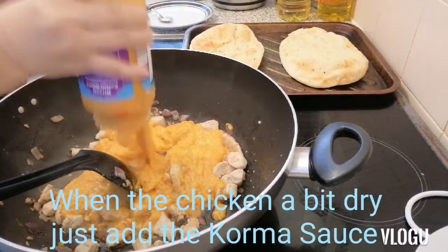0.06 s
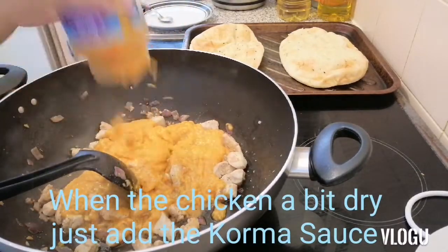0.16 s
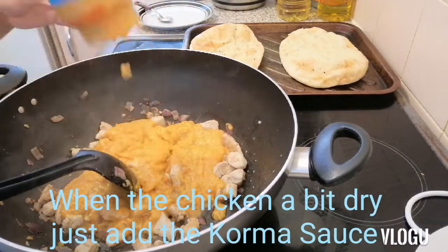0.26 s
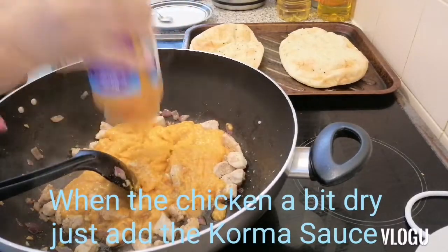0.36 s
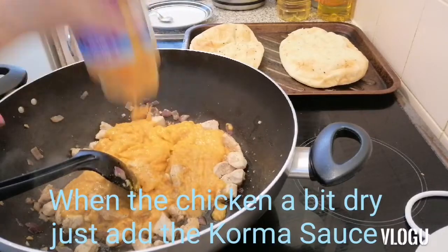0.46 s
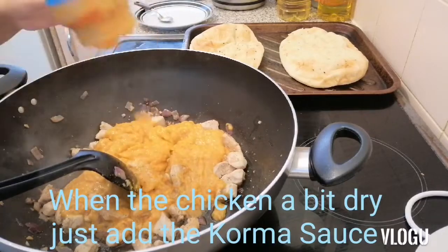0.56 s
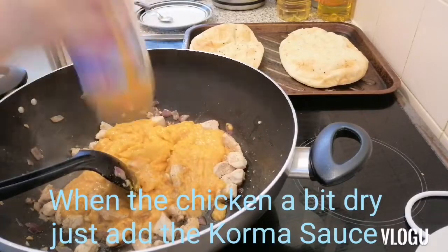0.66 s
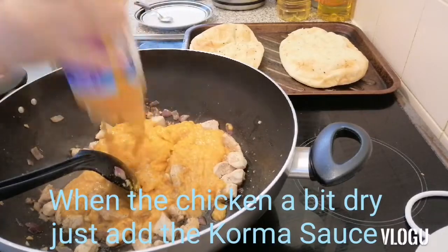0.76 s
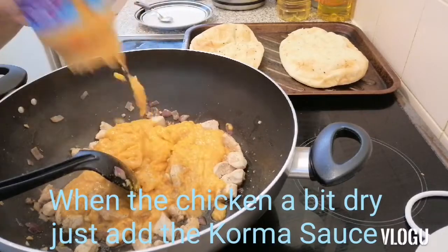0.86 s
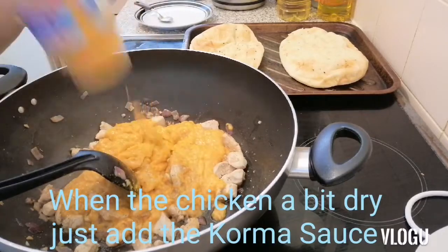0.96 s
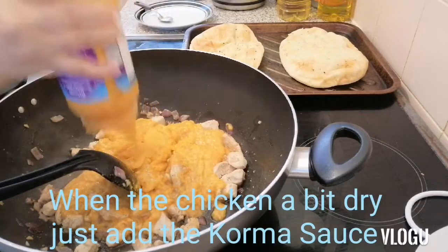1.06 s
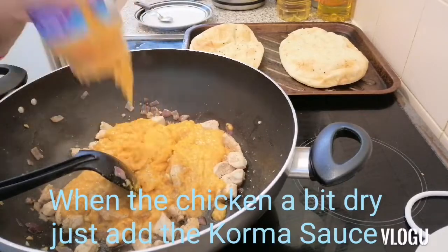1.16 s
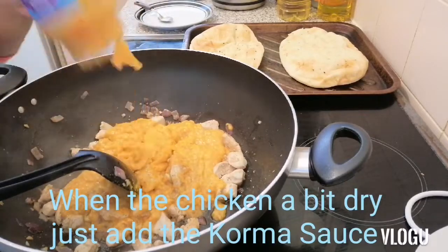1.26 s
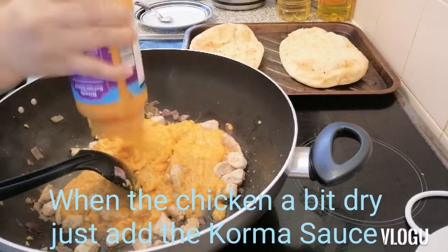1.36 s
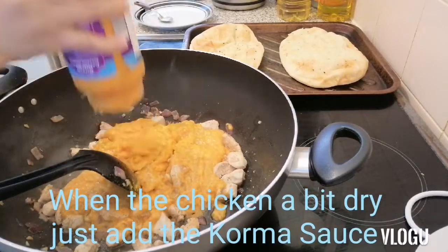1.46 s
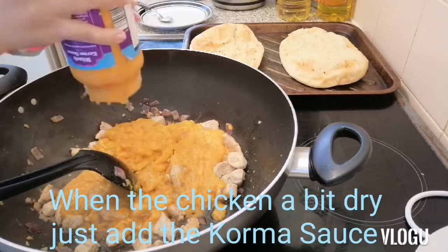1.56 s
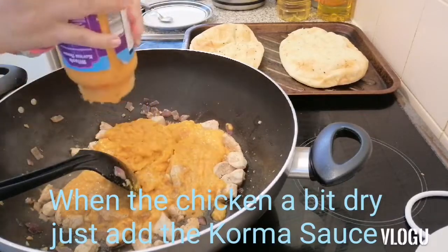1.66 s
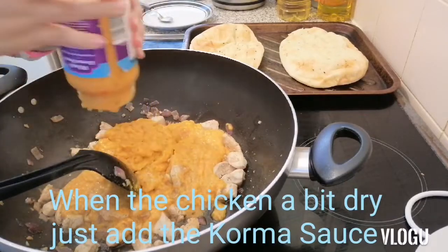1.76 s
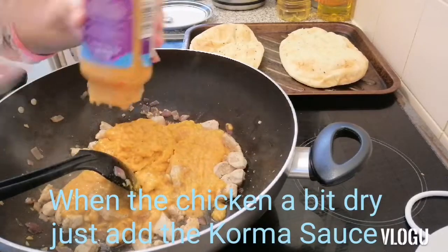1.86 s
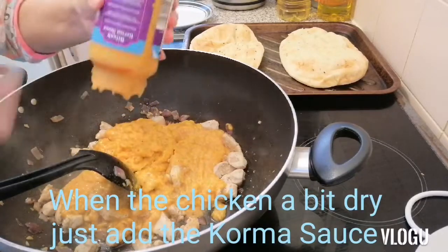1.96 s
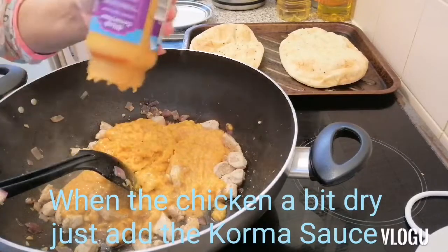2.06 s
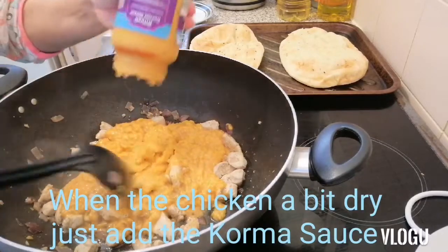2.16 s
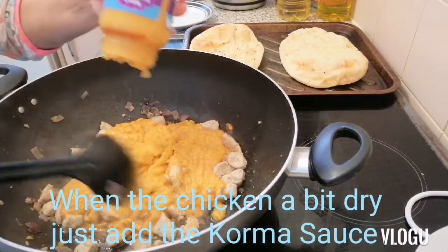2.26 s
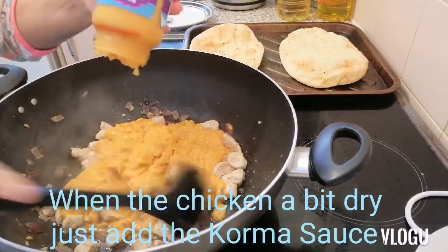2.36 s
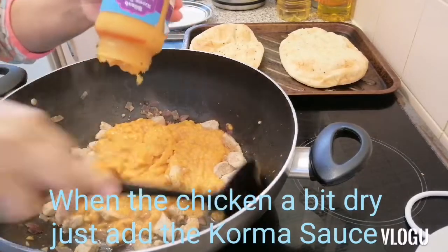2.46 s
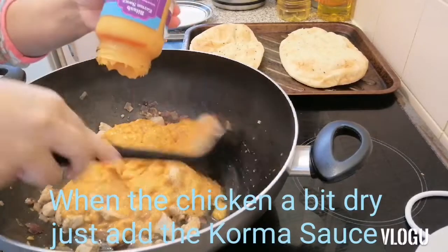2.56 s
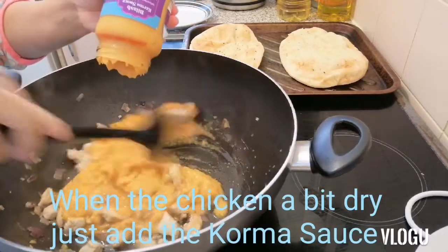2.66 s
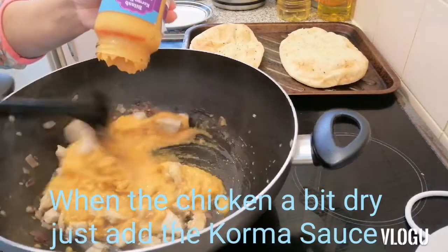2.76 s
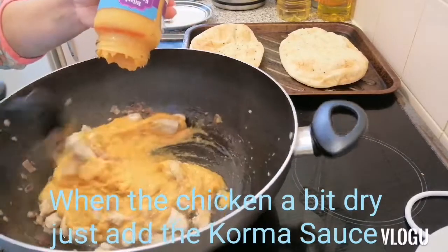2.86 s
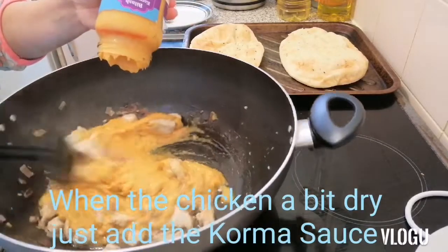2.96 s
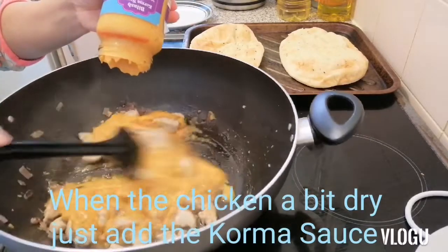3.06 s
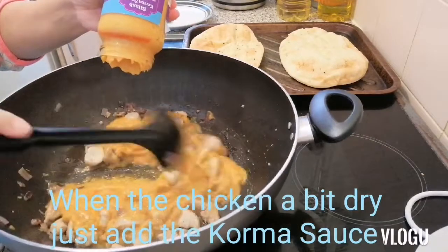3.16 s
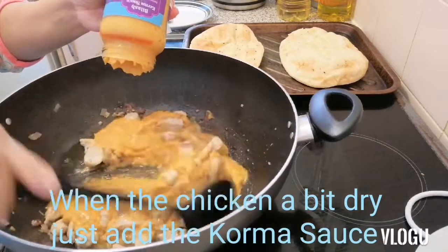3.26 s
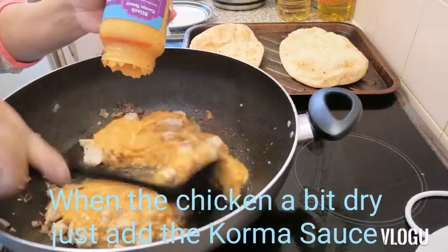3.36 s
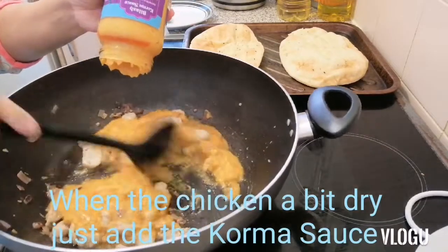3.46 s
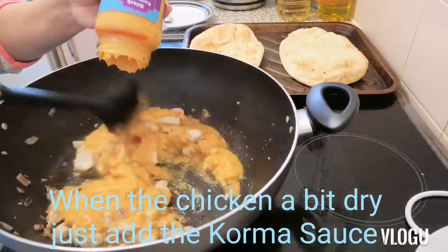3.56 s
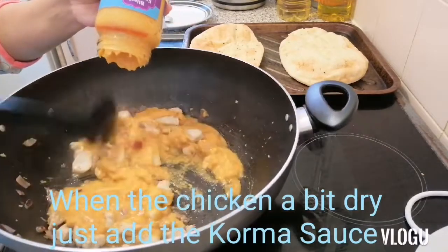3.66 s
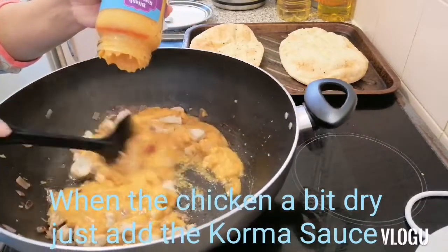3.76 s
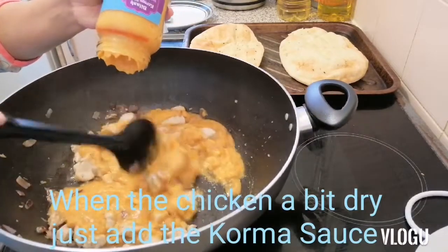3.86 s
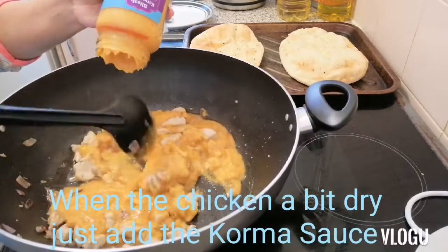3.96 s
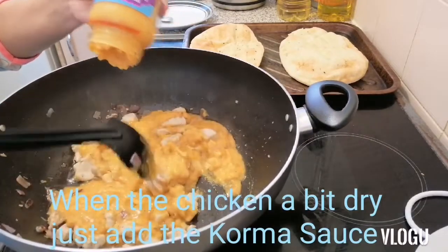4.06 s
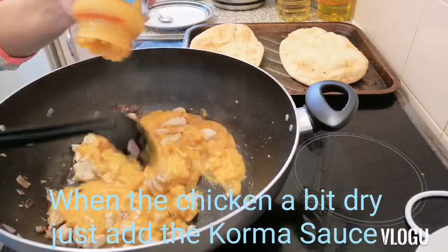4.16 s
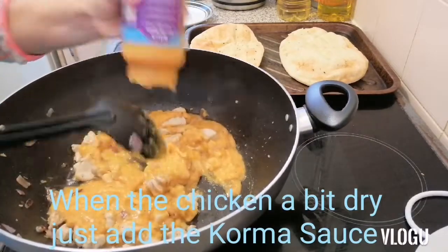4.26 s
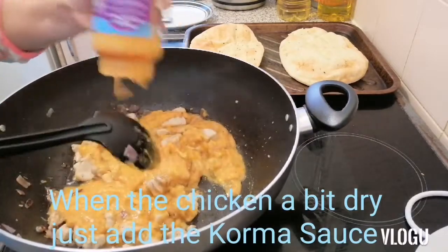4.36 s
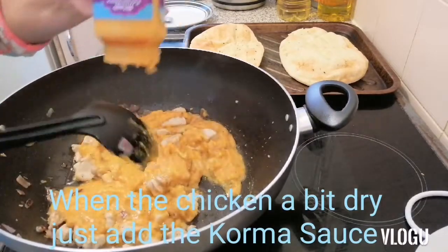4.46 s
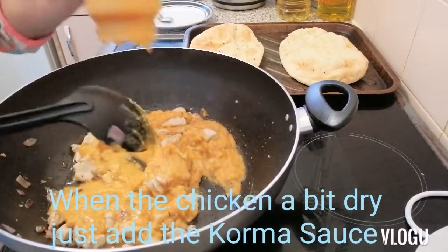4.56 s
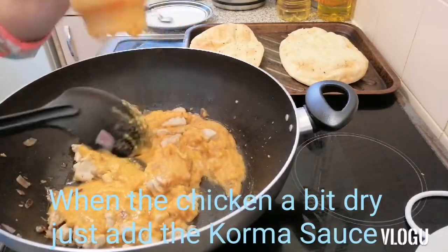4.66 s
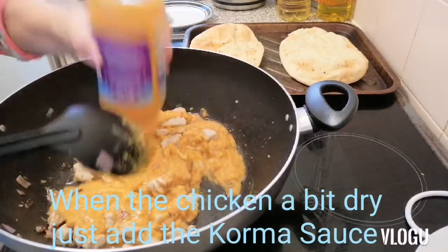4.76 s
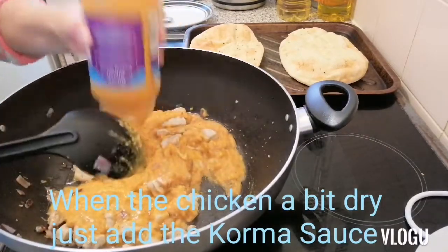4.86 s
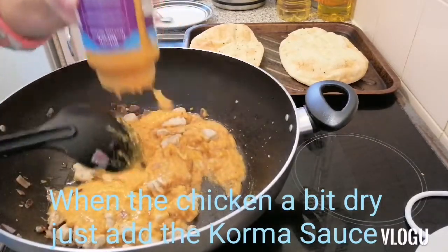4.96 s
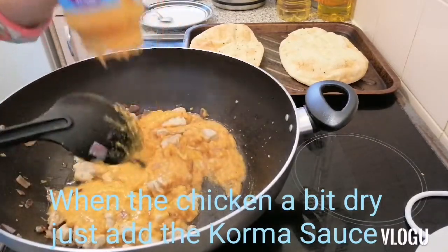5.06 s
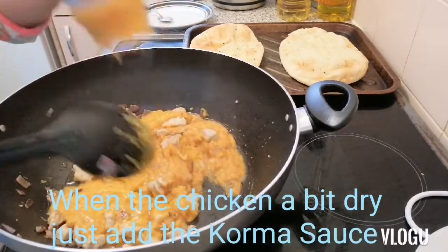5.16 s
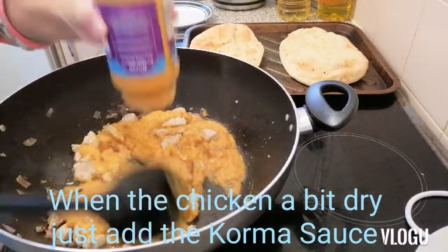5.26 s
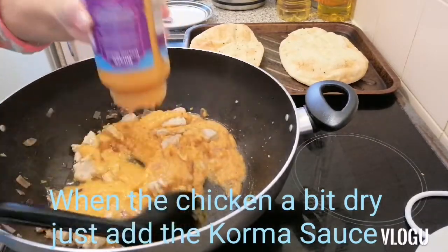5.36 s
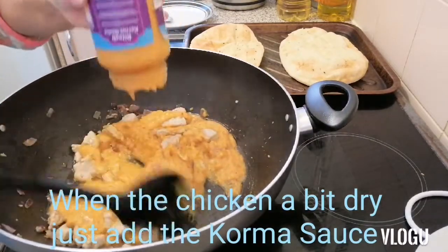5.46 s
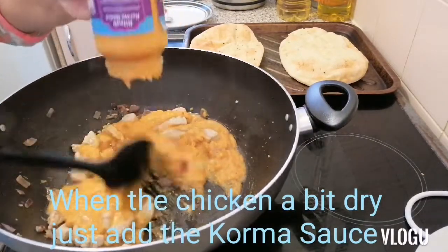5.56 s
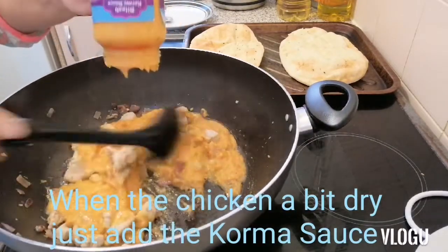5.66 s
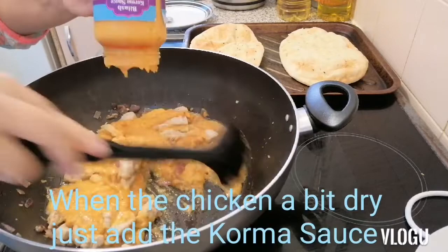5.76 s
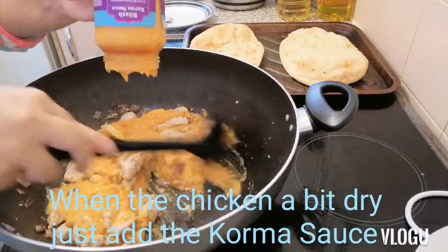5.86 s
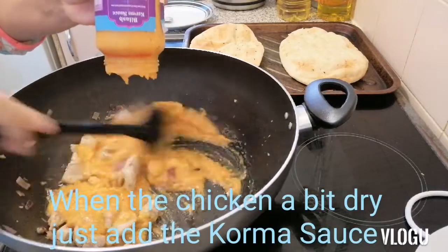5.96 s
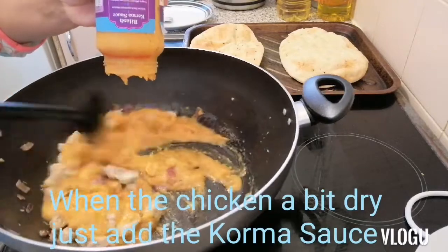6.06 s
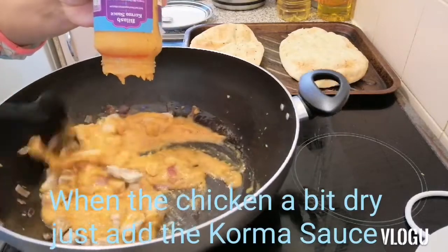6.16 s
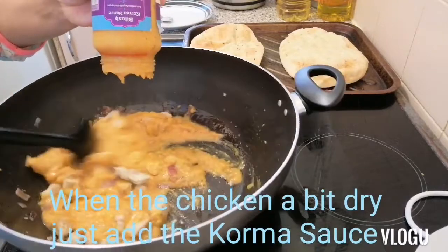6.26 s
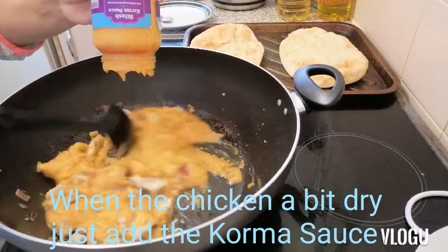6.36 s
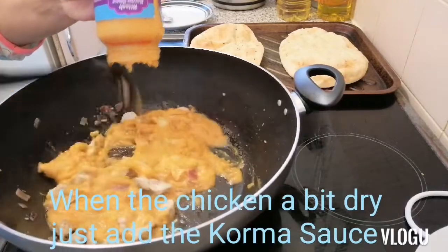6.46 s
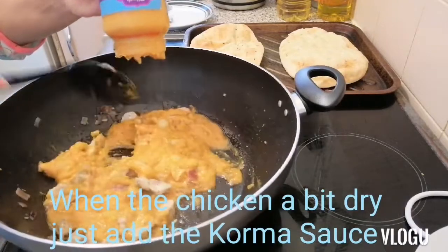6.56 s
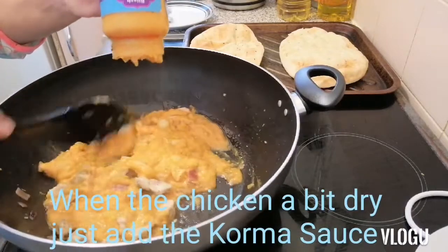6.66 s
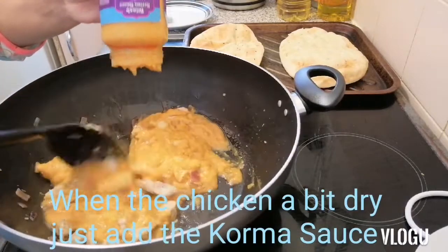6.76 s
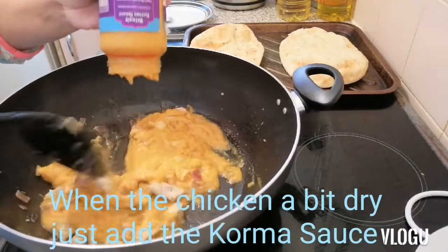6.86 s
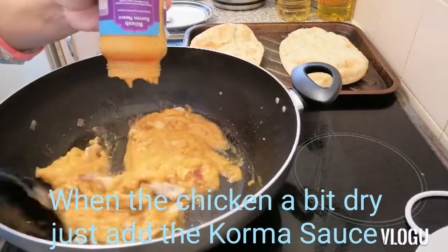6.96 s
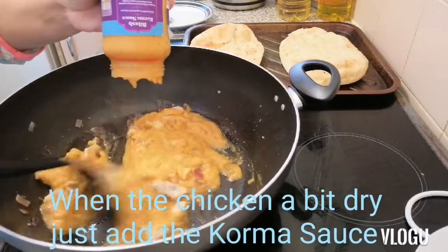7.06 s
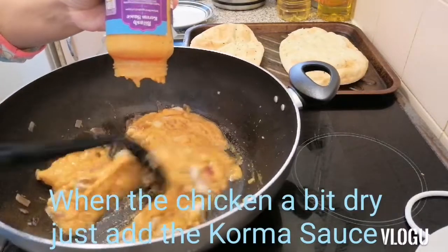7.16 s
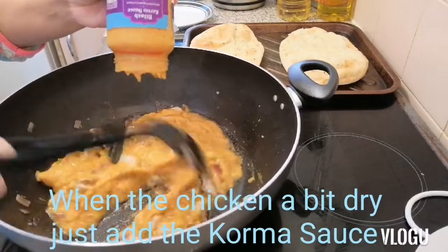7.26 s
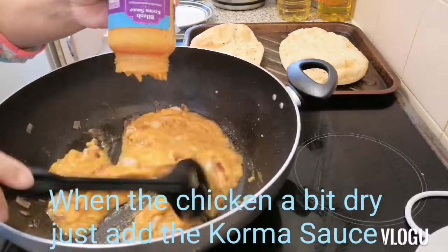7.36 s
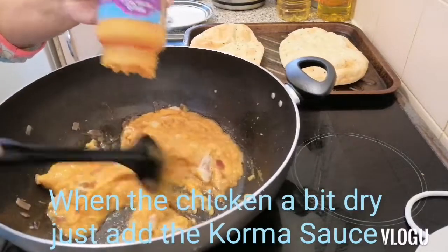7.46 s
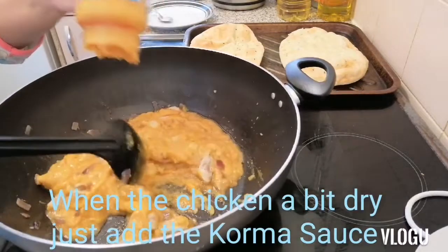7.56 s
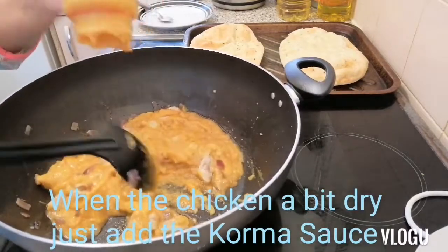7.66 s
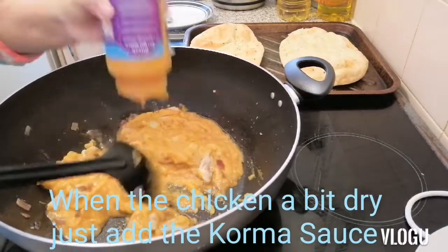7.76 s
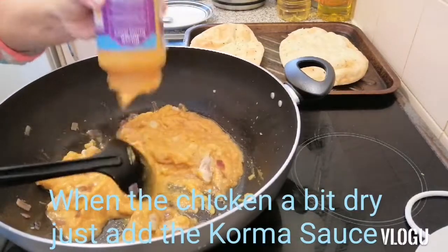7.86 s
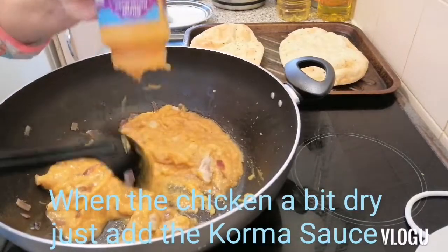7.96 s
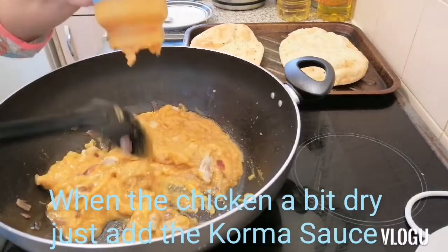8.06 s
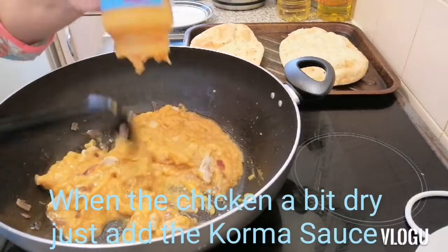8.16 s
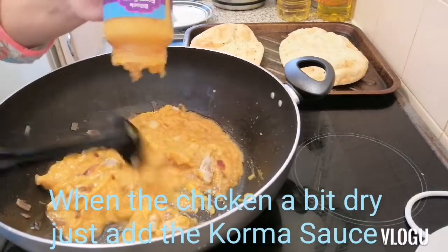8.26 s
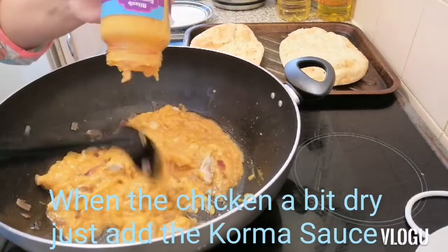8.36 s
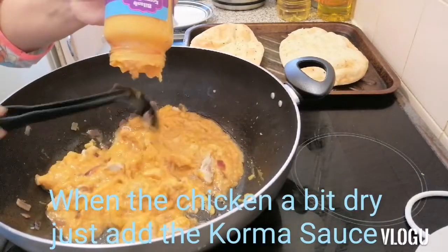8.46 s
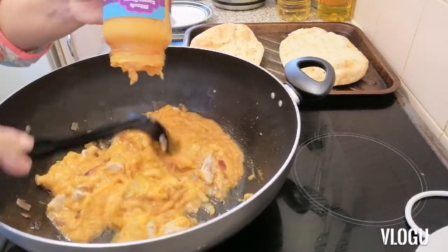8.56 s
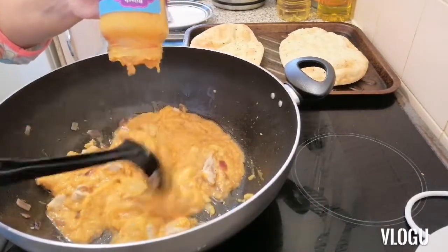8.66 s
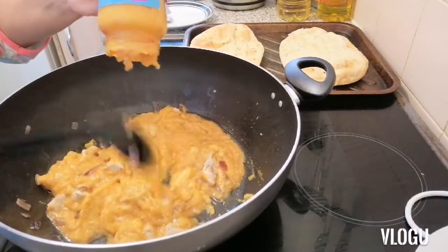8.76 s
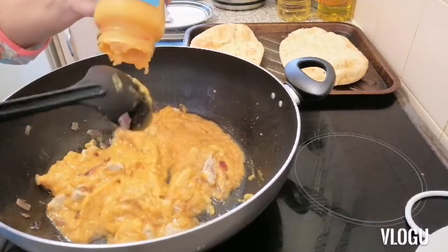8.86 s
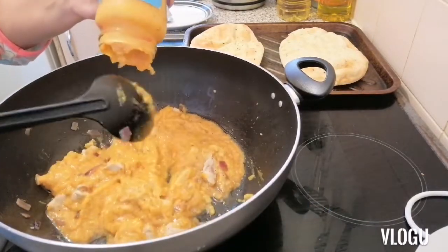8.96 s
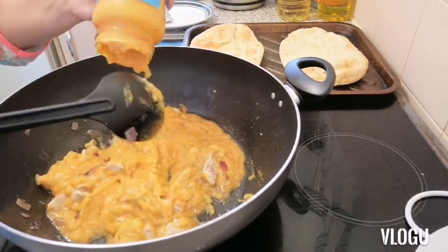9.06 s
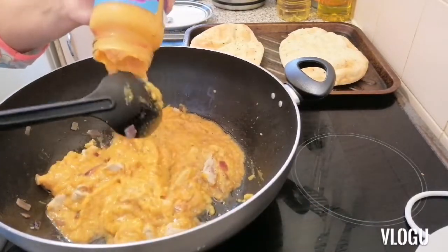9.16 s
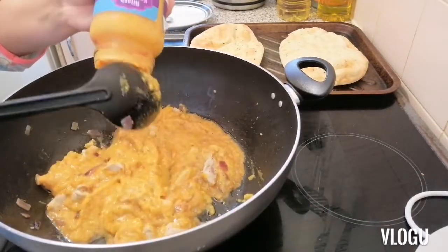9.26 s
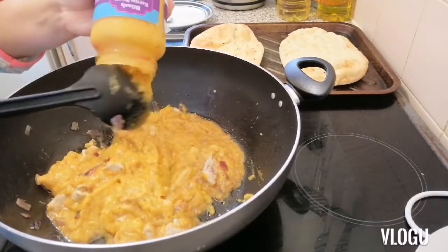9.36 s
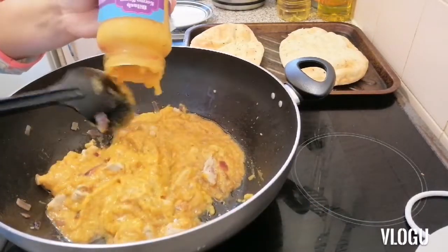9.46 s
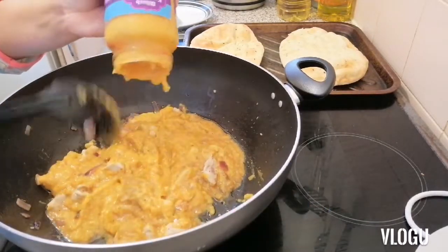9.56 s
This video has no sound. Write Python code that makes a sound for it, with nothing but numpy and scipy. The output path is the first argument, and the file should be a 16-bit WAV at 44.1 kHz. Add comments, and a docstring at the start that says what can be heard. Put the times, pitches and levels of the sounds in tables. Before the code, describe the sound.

Chicken sizzles in a wide pan, gradually smothered by thick sauce, while a plastic spatula scrapes, clacks and thuds in a small, hard-walled kitchen.

```python
"""Diced chicken sizzles in a wide pan on an electric hob in a small kitchen: bubbles burst over a hiss of steam.
Thick sauce from a glass jar is stirred in and slowly smothers the frying. A plastic spatula scrapes through it as
sliding bands of tiny slips, and its blows ring the pan's modes: clacks on the wall, thuds on the glass top.
The hob hums in wavering sines under the fan's rush of air. Handling and pops of fat gain the room's echoes;
the frying and the hob reach the microphone without them."""
import sys
import numpy as np
from scipy import signal
from scipy.fft import rfft, irfft, next_fast_len
from scipy.io import wavfile

SR = 44100
rng = np.random.default_rng(int(sys.argv[2]) if len(sys.argv) > 2 else 0)


def generate_wav(signal):
    """Clip the signal to [-1, 1] and save it as 16-bit WAV at the path in sys.argv[1]."""
    frames = np.transpose(np.atleast_2d(signal))
    scaled = np.clip(frames, -1, 1) * 32767
    pcm = np.round(scaled).astype(np.int16)
    wavfile.write(sys.argv[1], SR, pcm)


N = 423345
TIME = np.arange(N) / SR
CUTOFF_HZ = 15250   # top of the whole sound


def sizzle(bursts_per_s=7000, spread_db=2.6, steam_db=0.0, spits_per_s=130, spit_db=-16,
           crackle_db=-12.0, sputter_db=1.07, spray_sputter_db=1.4, split_hz=3800):
    """Steam bubbles burst in fat over a hiss, with crackle and spits; sauce damps these and the fine spray most."""
    # colour of the frying before the pan shapes it: (frequency [Hz], relative density [dB per Hz])
    frying_colour = [(300, -14), (600, -15.5), (850, -10), (1150, -6), (1450, -3), (2050, 1), (2700, -5),
                     (4100, -11.5), (5400, -11), (6500, -12.5), (8400, -17), (9600, -12), (12000, -22.5),
                     (15000, -29)]
    start_db, spray_start_db = -44, -48.5
    spray_follows = 1.4   # dB of spray lost for each dB of frying lost
    loss_db = smothering()

    bursts = grains(bursts_per_s * from_db(-loss_db / 2), spread_db)
    steam = from_db(steam_db) * rng.standard_normal(N)
    frying = in_pan(coloured(bursts + steam, frying_colour))
    coarse = rms_one(signal.sosfilt(signal.butter(3, split_hz, "low", fs=SR, output="sos"), frying))
    spray = rms_one(signal.sosfilt(signal.butter(3, split_hz, "high", fs=SR, output="sos"), frying))

    spits = in_pan(band(grains(spits_per_s, 3.7), 5000, 12000))
    coarse = coarse + from_db(crackle_db - loss_db / 2) * crackle()
    spray = spray + from_db(spit_db - loss_db / 2) * spits
    # bubbles go off in small clusters
    coarse = coarse * from_db(sputter_db * drift(70))
    spray = spray * from_db(spray_sputter_db * drift(70))
    return from_db(start_db - loss_db) * coarse + from_db(spray_start_db - spray_follows * loss_db) * spray


def smothering(cooling_db_per_s=1.0, fold_s=0.35):
    """Loss of the frying in dB: sauce cools it steadily, and each fold over hot metal takes a step more."""
    # folds of sauce over hot metal: (time of mid-fold [s], loss [dB])
    folds = [(2.95, 2.5), (7.15, 3), (8.6, 2.5)]
    loss_db = cooling_db_per_s * TIME
    for s, fold_loss_db in folds:
        loss_db = loss_db + fold_loss_db * np.clip((TIME - s) / fold_s + .5, 0, 1)
    return loss_db


def crackle(per_s_each=35, spread_db=0.7, low_hz=1800, high_hz=4400, q=9):
    """Larger bubbles burst one by one, each with a brief ring at one of eight pitches; rms 1."""
    out = np.zeros(N)
    for hz in np.geomspace(low_hz, high_hz, 8):
        bursts = grains(per_s_each, spread_db) + 1e-18
        out += signal.lfilter(*signal.iirpeak(hz, q, SR), bursts)
    return rms_one(out)


def in_pan(x):
    """The bowl shapes a few pitches of the frying, and short echoes comb its spectrum; rms 1."""
    # resonances of the pan's bowl over the food: (frequency [Hz], width [Hz], boost [dB])
    bowl = [(894, 210, 2.5), (1123, 14, 10.5), (1190, 63, 0.5), (1490, 79, -0.5), (1800, 110, 2),
            (1870, 60, -1), (2030, 106, 4.5), (2270, 27, 3.5), (3360, 90, 0), (5000, 125, 3.5),
            (5320, 75, 5), (5630, 42, 10)]
    # short echoes inside the pan and close around it: (delay [s], level [dB])
    near_echoes = [(.0017, -34), (.0031, -18), (.0047, -19.5), (.0083, -27), (0.014, -10.5)]
    shaped = x
    for hz, width_hz, boost_db in bowl:
        shaped = shaped + (from_db(boost_db) - 1) * signal.lfilter(*signal.iirpeak(hz, hz / width_hz, SR), x)
    combed = shaped
    for delay, db in near_echoes:
        combed = combed + from_db(db) * np.interp(TIME - delay, TIME, shaped, left=0)
    return rms_one(combed)


def knocks(tick_low_hz=4600, tick_top_hz=8000, tick_t60=.06):
    """Blade on the pan's floor: a softer contact is duller, and the weight behind it rocks the pan on the glass."""
    # Sauce softens the contact, the spot struck sets the hollow note, the hand damps the thud.
    # (time [s], level before the mix trim [dB], contact top [Hz], hollow note [Hz], its lift [dB],
    #  first-touch tick before the trim [dB], thud before the trim [dB], t60 of the hand's damping [s])
    landings = [(2.533, -45, 1600, 400, 4, -75, -41.5, 1), (2.789, -46.5, 746, 400, 7, -85, -42.5, 1.1),
                (2.9175, -33.5, 2200, 565, 8, -52, -33.5, 3),
                (3.6626, -29.5, 3180, 340, 8, -43.5, -29.5, 0.46), (3.684, -41, 900, 340, 7, -80, -32, .3),
                (5.393, -40.5, 1630, 700, 1, -70, -42.5, 1), (5.416, -42.5, 3720, 700, 4, -55, -64, 1),
                (5.869, -39.5, 2220, 780, 4, -62, -42.5, 1), (6.148, -52.5, 2580, 344, 3, -64, -53, 1),
                (6.561, -36.5, 2800, 600, 9, -56, -38.5, 0.44),
                (6.579, -47.5, 700, 344, 8, -80, -36.5, 0.35), (7.027, -35, 1900, 750, 3, -66, -28.5, 1.5),
                (7.096, -37.5, 1120, 700, 2, -70, -28, 0.19), (7.116, -55, 700, 500, 4, -80, -39, 0.22),
                (7.3112, -21, 2750, 740, 6, -33, -41, 1.2), (8.508, -21.5, 2570, 1300, 3.5, -42.5, -46, .6),
                (9.254, -57.5, 2500, 1700, 4, -75, -66, .3)]
    thud_low_hz, thud_top_hz = 28, 368
    out = np.zeros(N)
    for s, db, contact_hz, hollow_hz, hollow_db, tick_db, thud_db, thud_t60 in landings:
        pan = blow()
        t = TIME[:len(pan)]

        floor = band(pan, thud_top_hz, CUTOFF_HZ, order=4)
        # the springy contact lifts a band round its top
        floor = lift(floor, contact_hz, 1.1, 1)
        floor = lift(floor, hollow_hz, 2.6, hollow_db)
        floor = low_pass(floor, contact_hz, order=6)

        tick = band(pan, tick_low_hz, tick_top_hz, order=1) * fade(t, tick_t60)

        thud = band(pan, thud_low_hz, CUTOFF_HZ)
        thud = lift(thud, 65, .8, 4.5)   # the hob's glass booms
        thud = low_pass(thud, thud_top_hz, order=4) * fade(t, thud_t60)
        add(out, s, at_level(floor, db) + at_level(tick, tick_db) + at_level(thud, thud_db))
    return out


def clacks():
    """Blade's edge on the bare wall, a bright clack without rocking; blade and rim notes vary from strong to weak."""
    # (time [s], level before the mix trim [dB], then lift or cut [dB] of the blade's note, of the hollow,
    #  of the rim's note and of the treble)
    wall_hits = [(2.887, -19, 16, 2.5, -4.5, 0), (2.893, -30.5, 8, 5, -3, 1), (5.444, -40.5, -11, 6, 0, -9),
                 (6.52, -25.5, -0.5, -12, 1, 2.5), (6.9232, -26, 5.5, 0, 2.5, -7),
                 (6.930, -36.5, -5, -8, 11, 5)]
    out = np.zeros(N)
    for s, db, blade_db, hollow_db, rim_db, treble_db in wall_hits:
        wall = low_pass(band(blow(), 815, 18000, order=6), 3100, order=1)
        wall = lift(wall, 1440, 3.2, blade_db)   # the plastic blade's own note
        wall = lift(wall, 5240, 2.9, rim_db)
        wall = lift(wall, 2950, 2.3, hollow_db)   # between the notes of blade and rim
        wall = lift(wall, 9800, 0.9, treble_db)   # a sharper edge has more
        add(out, s, at_level(wall, db))
    return out


def blow(contact_t60=0.013, contact_cycles=1.6, free_db=-38, rocking_db=-10, rocking_hz=230, snap_db=8,
         snap_t60=0.0017, clatter_db=8.0, clatter_t60=0.033, scatter_db=1.5, top_hz=10400):
    """Snap, brief clatter and pan modes: contact damps them, but low ones, the pan rocking on the hob, ring on."""
    # modes of the pan on the hob: (frequency [Hz], level before scatter [dB], free t60 [s])
    pan_modes = [(38.3, -7, .3), (73.4, -2, 0.49), (124, -2, 0.27), (156.2, 3, 0.37), (207.3, 3.5, 0.091),
                 (294.8, -2, 0.15), (337.5, -1, 0.12), (464, -6.5, 0.064), (723, -4.5, 0.069),
                 (768, -3.5, .25), (896, -2, .22), (1320, -1, .12), (1260, 1, 0.58), (1466, 1.5, 0.029),
                 (1733, 0.5, .2), (2125, 2, 0.109), (2144, 3.5, 0.038), (2360, -6.5, .2),
                 (2560, -7.5, 0.06), (3110, -12.5, 0.16), (3620, 0.5, 0.079), (4416, 9, 0.16),
                 (5010, 9.5, 0.13), (5080, 8.5, 0.074), (5350, 11, .11), (5940, 8.5, 0.086),
                 (6590, 2, 0.056), (7370, 5, .12), (8750, -2, .1), (9600, 1, .1), (10650, 3.5, .12)]
    t = TIME[:SR // 2]
    envelope = from_db(snap_db) * fade(t, snap_t60) + from_db(clatter_db) * fade(t, clatter_t60)
    out = band(rng.standard_normal(len(t)) * envelope, rocking_hz, 12600, order=1)
    for k, (hz, db, t60) in enumerate(pan_modes):
        free = from_db(free_db) + from_db(rocking_db) / (1 + (hz / rocking_hz) ** 4)
        decay = fade(t, contact_t60 + contact_cycles / hz) + free * fade(t, t60)
        gain = from_db(db + scatter_db * rng.standard_normal())
        out += (-1) ** k * gain * np.sin(2 * np.pi * hz * t) * decay
    # plastic is too soft to excite the highest treble
    return low_pass(out, top_hz, order=3)


def scrapes(slips_per_s=3500, spread_db=1.5, stick_db=3.5, skirt_db=-13, skirt_low_hz=700, skirt_high_hz=4500,
            hiss_low_hz=2900, hiss_high_hz=6000):
    """Dense tiny slips of the blade ring in a resonance that slides; sauce pushed onto hot metal hisses."""
    # spatula strokes: (start [s], length [s], scrape level before the mix trim [dB], centre [Hz],
    #  rise [octaves], width [octaves], hiss level before the trim [dB])
    strokes = [(2.457, 0.22, -37, 1800, .2, .7, -52), (2.931, 0.14, -35, 1800, 0.45, 1, -53.5),
               (3.037, 0.16, -44, 1950, 0.082, 0.66, -61), (3.27, 0.17, -36.5, 1800, 0.46, 1.2, -49.5),
               (3.66, 0.066, -37, 2230, -0.22, 1.1, -56), (3.73, 0.18, -46, 1950, -0.043, 0.34, -57),
               (3.803, 0.1, -39, 1920, 0.088, 0.4, -81), (5.386, .15, -42.5, 1930, 0.33, 0.99, -48.5),
               (5.734, 0.25, -56, 2000, .3, 0.97, -53.5), (5.957, 0.79, -60, 1990, 0.17, .8, -59.5),
               (6.312, 0.064, -51.5, 2340, 0.24, 1.1, -72), (6.561, 0.086, -41.5, 2670, -0.43, 1, -66),
               (6.589, .24, -42.5, 1730, .1, 1.16, -65), (6.68, 0.023, -40.5, 2320, 0.023, 0.077, -62),
               (6.964, 0.028, -36.5, 1580, 0.025, 1, -67), (6.978, .06, -33, 1240, 0.81, .9, -66),
               (7.017, 0.06, -32.5, 2020, 0.456, .6, -60), (8.123, 0.26, -60, 2020, 0.22, 0.77, -73),
               (8.506, .055, -31, 2480, -0.054, 0.26, -76), (8.567, 0.047, -41, 1730, 0.0062, 0.53, -76)]
    press_share = 0.37   # share of a stroke until it presses hardest
    hiss_share, hiss_t60 = 0.45, 0.85   # share until the bared metal hisses most; then it fades behind the blade [s]
    slips = grains(slips_per_s, spread_db) * from_db(stick_db * drift(120))
    skirt = from_db(skirt_db) * rms_one(band(slips, skirt_low_hz, skirt_high_hz, order=3))
    hiss = band(rng.standard_normal(N), hiss_low_hz, 11700, order=3)
    hiss = rms_one(low_pass(hiss, hiss_high_hz, order=1))
    out, flare = np.zeros(N), np.zeros(N)
    for start, length, db, hz, rise, width, hiss_db in strokes:
        hardest = start + length * press_share
        pressure = np.interp(TIME, [start, hardest, start + length], [0, 1, 0])
        on = pressure > 0
        edge = 2 ** (max(width, .05) / 2)
        ring = band(slips[TIME > start][:SR], hz / edge, hz * edge)
        # reading the ring ever faster or slower slides its pitch
        speed = 2 ** (rise * np.linspace(-.5, .5, on.sum()))
        sliding = np.interp(np.cumsum(speed), np.arange(len(ring)), ring)
        out[on] += from_db(db) * pressure[on] * (rms_one(sliding) + skirt[on])

        t, swell_s = TIME[:SR], length * hiss_share
        swell = np.minimum(t / swell_s, 1) * fade(np.maximum(t - swell_s, 0), hiss_t60)
        add(flare, start, from_db(hiss_db) * swell)
    return out + flare * hiss


def pings(rows, ring_t60, ring_q, click_db, click_t60):
    """Light taps or pops: each is a tiny click and a short, damped ring."""
    t, out = TIME[:SR // 8], np.zeros(N)
    for s, hz, db in rows:
        noise = rng.standard_normal(len(t))
        ring = signal.lfilter(*signal.iirpeak(hz, ring_q, SR), band(noise, 0.73 * hz, 1.7 * hz))
        ring = rms_one(ring) * fade(t, ring_t60)
        click = from_db(click_db) * band(noise, 1400, 13000) * fade(t, click_t60)
        add(out, s, from_db(db) * (ring + click))
    return out


def hob(waver_db=2.0, phase_wander=.12, fan_wander=1.0, hum_fade_db_per_s=0.65):
    """Mains hum and the wavering lines of the cooling fan slowly grow quieter, over a steady rush of air."""
    # hum of hob and fan: (frequency [Hz], starting level before wavering [dB rms])
    hum_lines = [(33, -69), (66.5, -58.5), (99.9, -45), (133, -64), (161, -60.5), (199.6, -59), (232, -69),
                 (298.5, -65.5), (332, -72.5), (399, -72)]
    # colour of the fan's air: (frequency [Hz], relative density [dB per Hz])
    fan_colour = [(20, 10.5), (35, 7.5), (60, 0), (120, 4), (190, -2.5), (270, -9), (400, -18), (600, -21),
                  (1200, -22), (4000, -58)]
    loudest_db = max(db for hz, db in hum_lines)
    hum = np.zeros(N)
    for hz, db in hum_lines:
        # the loudest line holds its phase [rad] more firmly
        wander = phase_wander if db == loudest_db else fan_wander
        gain = np.sqrt(2) * from_db(db + waver_db * drift(9.7))
        hum += gain * np.sin(2 * np.pi * hz * TIME + wander * drift(5.7))
    air = from_db(-52.5) * coloured(rng.standard_normal(N), fan_colour)
    return from_db(-hum_fade_db_per_s * TIME) * hum + air


def kitchen(x, wet_db=-3.5, first_echo_s=0.0011):
    """Worktop and tiled walls answer at once with dense echoes, even in all bands, each dying at its own rate."""
    # kitchen reverberation: (frequency [Hz], t60 [s])
    kitchen_t60 = [(60, 1), (200, 0.38), (600, 0.33), (2000, 0.26), (5000, 0.32), (12000, 0.23)]
    t, edges = TIME[:SR // 2], np.geomspace(25, 18000, 24)
    build_up = np.clip(t / first_echo_s - .5, 0, 1)
    tail = np.zeros(len(t))
    for low, high in zip(edges, edges[1:]):
        decay = fade(t, at_hz(kitchen_t60, np.sqrt(low * high)))
        echoes = band(rng.standard_normal(len(t)), low, high) * build_up * decay
        tail += np.sqrt(high - low) * rms_one(echoes)   # wider bands carry more power
    return x + from_db(wet_db) * signal.fftconvolve(x, tail / np.linalg.norm(tail))[:N]


def from_db(db):
    """Decibels to gain."""
    return 10 ** (np.asarray(db) / 20)


def rms_one(x):
    """Scale to unit power."""
    return x / np.sqrt(np.mean(x ** 2) + 1e-20)


def at_hz(points, hz):
    """Read a table on a log-frequency axis."""
    f, value = np.transpose(points)
    return np.interp(np.log(np.maximum(hz, 1)), np.log(f), value)


def band(x, low_hz, high_hz, order=2):
    """Causal band-pass."""
    sos = signal.butter(order, [low_hz, min(high_hz, SR / 2 - 1)], "band", fs=SR, output="sos")
    return signal.sosfilt(sos, x + 1e-18)


def low_pass(x, top_hz, order=2):
    """Causal low-pass."""
    return signal.sosfilt(signal.butter(order, min(top_hz, SR / 2 - 1), fs=SR, output="sos"), x)


def lift(x, hz, q, db):
    """Raise or lower a band round one pitch."""
    return x + (from_db(db) - 1) * signal.lfilter(*signal.iirpeak(hz, q, SR), x)


def coloured(x, spectrum):
    """Give a steady sound a spectrum; rms 1."""
    size = next_fast_len(N)
    gain = from_db(at_hz(spectrum, np.arange(size // 2 + 1) * SR / size))
    return rms_one(irfft(rfft(x, size) * gain, size)[:N])


def fade(t, t60):
    """Loses 60 dB in t60 seconds."""
    return np.exp(-np.log(1000) * t / max(t60, 1e-4))


def drift(rate):
    """Random values joined by straight lines, rate of them a second; rms 1."""
    steps = rng.standard_normal(N // 20)
    return rms_one(np.interp(TIME * rate, np.arange(N // 20), steps))


def grains(per_s, spread_db):
    """Random clicks, many small and a few large; rms 1."""
    sizes = from_db(spread_db * np.minimum(rng.exponential(1, N), 6)) * rng.choice([-1, 1], N)
    return rms_one(sizes * (rng.random(N) < per_s / SR))


def at_level(x, db):
    """Set the level of a blow's first 20 ms."""
    return from_db(db) * x / np.std(x[:SR // 50])


def add(out, s, x):
    """Mix a sound in at a time in seconds."""
    at = round(s * SR)
    out[at:at + len(x)] += x[:N - at]


def scene(knock_db=-1, clack_db=-1, scrape_db=-2, jar_db=-3):
    """Spatula, pan, jar and popping fat echo in the kitchen, over the frying and the hob."""
    # light taps on the sauce jar: (time [s], ring [Hz], level before the mix trim [dB])
    jar_taps = [(6.149, 10200, -49), (7.812, 7900, -51), (8.479, 5400, -41), (8.485, 5500, -41),
                (9.258, 7600, -51), (9.265, 7600, -47.5)]
    # the loudest pops of fat: (time [s], ring [Hz], level [dB])
    fat_pops = [(.079, 3670, -42), (1.067, 3640, -34.5), (3.967, 5500, -41)]
    jar = pings(jar_taps, ring_t60=0.013, ring_q=20, click_db=-5, click_t60=.008)
    pops = pings(fat_pops, ring_t60=0.009, ring_q=7.3, click_db=-8, click_t60=.005)
    spatula = from_db(knock_db) * knocks() + from_db(clack_db) * clacks() + from_db(scrape_db) * scrapes()
    handling = spatula + from_db(jar_db) * jar
    return (kitchen(handling + pops) + sizzle() + hob())[None]


def record(dry):
    """The top is cut steeply."""
    return signal.sosfilt(signal.ellip(10, .2, 70, CUTOFF_HZ, fs=SR, output="sos"), dry)


dry = scene()
out = record(dry)
generate_wav(out)
```